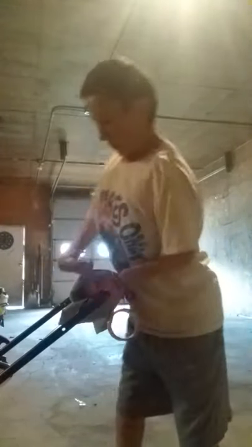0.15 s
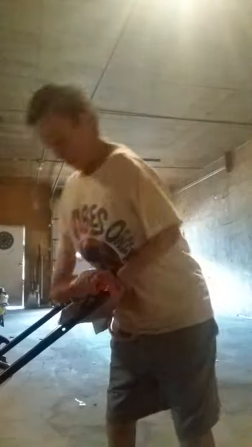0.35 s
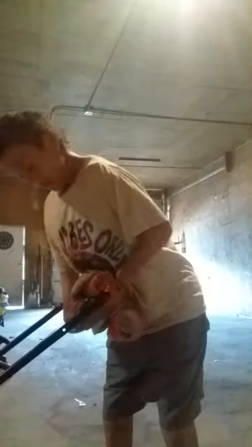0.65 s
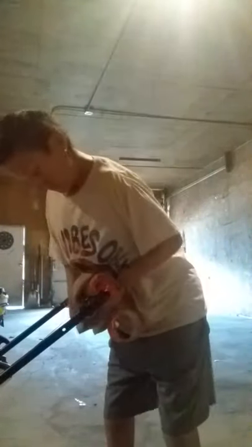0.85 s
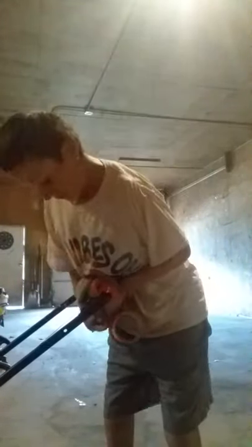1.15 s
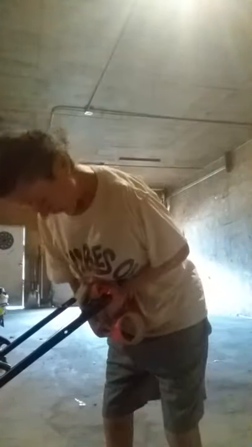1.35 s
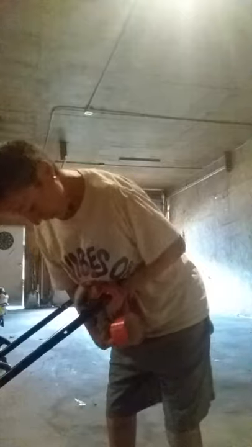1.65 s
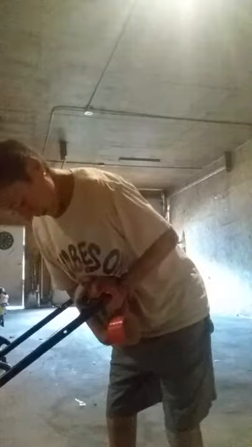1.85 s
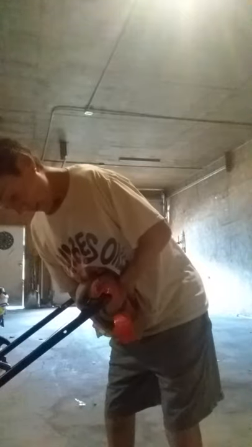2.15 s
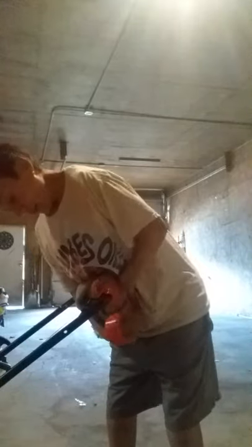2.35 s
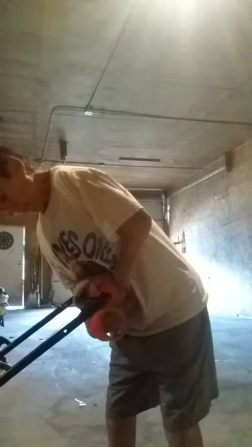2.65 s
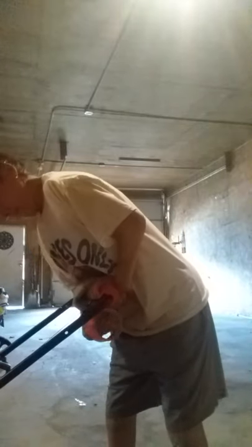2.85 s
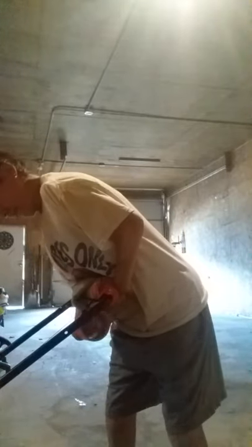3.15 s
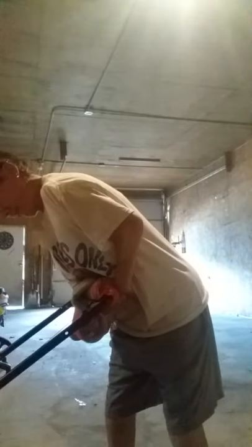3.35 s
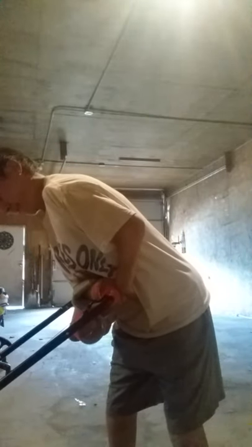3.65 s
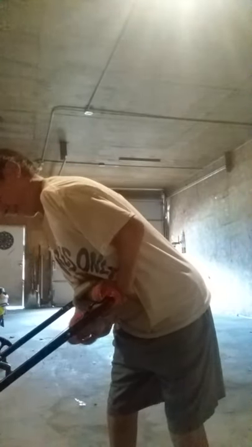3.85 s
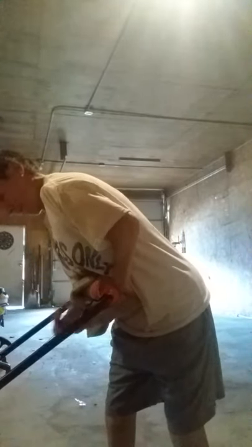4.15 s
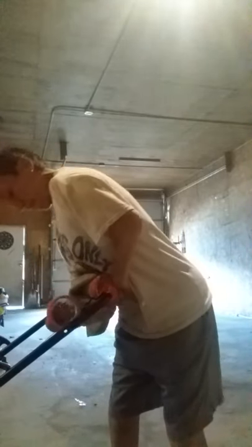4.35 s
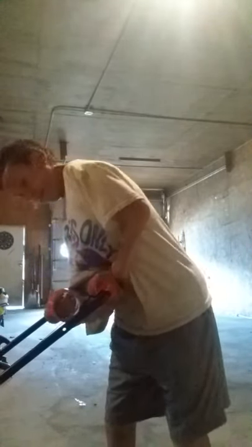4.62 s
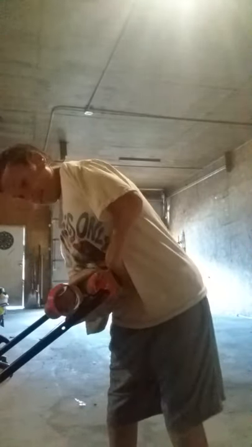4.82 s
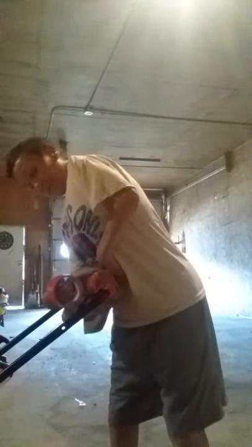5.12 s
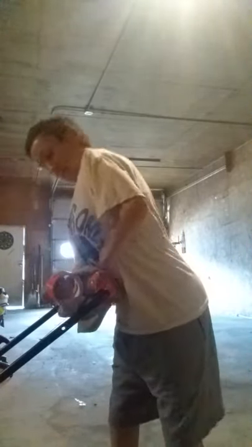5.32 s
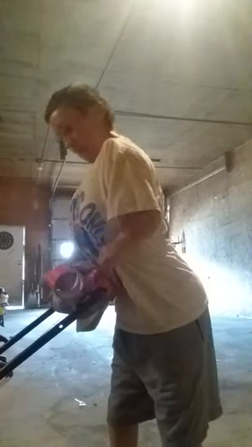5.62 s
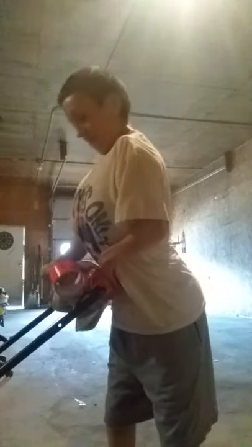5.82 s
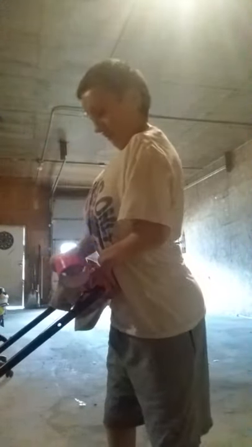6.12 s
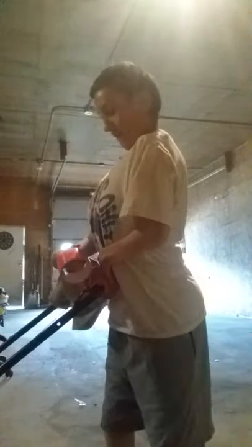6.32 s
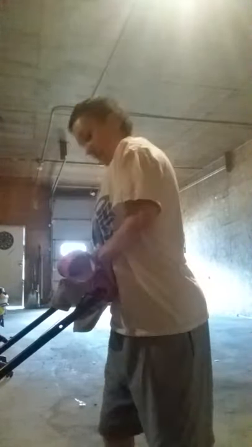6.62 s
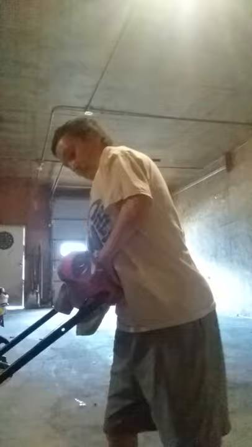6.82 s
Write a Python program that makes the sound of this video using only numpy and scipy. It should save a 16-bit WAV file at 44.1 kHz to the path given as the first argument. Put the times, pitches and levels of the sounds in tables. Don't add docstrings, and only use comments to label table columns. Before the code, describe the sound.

In a bare, hard-walled garage with a faint low hum and hiss, tape is handled close to a stereo microphone, slightly brighter on the right. From 0 to 1.2 s, cloth and skin rustle in short strokes, the handle rumbles, and dull knocks fall at the start, 0.5 and 0.95 s. A deeper double knock comes at 1.56 s amid near quiet and tiny ticks. Rustling resumes at 2.6 s with a low knock at 2.8 s. Then sharp, loud sticky rips crackle at 2.95, 3.34, 3.67, 3.84 and 4.12 s, each under a tenth of a second, with taut strip and hollow roll ringing and walls echoing. A lull follows until soft handling and knocks from 4.87 s. Rubbing grows stronger, a lighter rip snaps at 5.8 s, bright ticks patter from 6.07 to 6.6 s, and final rips crack at 6.64, 6.84 and 6.87 s, the last the loudest.

```python
import sys
import numpy as np
from scipy import signal
from scipy.io import wavfile
from scipy.ndimage import uniform_filter1d

SR = 44100
rng = np.random.default_rng(int(sys.argv[2]) if len(sys.argv) > 2 else 0)


def nominal_scale(level):
    x = np.asarray(level, float) / 20
    return 10 ** x


def log_audio(samples):
    frames = np.atleast_2d(samples).T
    limited = np.clip(frames, -1, 1)
    pcm = np.round(limited * 32767).astype(np.int16)
    wavfile.write(sys.argv[1], SR, pcm)


N = 307818

# pitch_hz [Hz], level_db [dB per Hz]
CRACKLE_COLOUR = [(600, -19), (1300, 0.5), (2000, 1.5), (3000, -4.5), (4500, -2.5), (7400, -4.5),
                  (8200, -15), (9000, -38), (10000, -19.5), (11500, -10), (13500, -21), (16000, -18)]
# low_hz [Hz], high_hz [Hz]
BAND_HZ = [272, 15800]
RIP_FADE_DB = -5
STROKE_ROOM = 15000


def evened(x):
    return x / np.sqrt(np.mean(x ** 2) + 1e-20)


def read(points, hz):
    f, value = np.transpose(points)
    return np.interp(np.log(hz + 1), np.log(f + 1), value)


def add(mix, s, sound):
    part = mix[round(s * SR):][:len(sound)]
    part += sound[:len(part)]


def colour(x, points):
    hz = abs(np.fft.fftfreq(4096, 1 / SR))
    log_gain = np.log(nominal_scale(np.maximum(read(points, hz), -100)))
    phase = -signal.hilbert(log_gain).imag
    taps = np.fft.ifft(np.exp(log_gain + 1j * phase)).real[:2048]
    return signal.oaconvolve(x, taps)[:len(x)]


def modes(x, table):
    out = np.zeros(len(x))
    for hz, width, db in table:
        pole = np.exp((2j * np.pi * hz - np.pi * width) / SR)
        out += nominal_scale(db) * 2 * signal.lfilter([1 - abs(pole)], [1, -pole], x).real
    return out


def glide(x, hz, width):
    turn = np.exp(2j * np.pi * np.cumsum(hz) / SR)
    r = np.exp(-np.pi * width / SR)
    once = signal.lfilter([1 - r], [1, -r], x / turn)
    return (turn * signal.lfilter([1 - r], [1, -r], once)).real


def turns(k, per_s):
    return np.sqrt(2 / 3) * np.cos(2 * np.pi * (np.arange(N) * per_s / SR + k / 3))


def crackle(count, per_s, spread_db):
    hit, size, sign = rng.random((count, 3)).T
    clicks = (hit < per_s / SR) * np.sign(sign - .5)
    return evened(clicks * nominal_scale(-spread_db * np.log(size + .06)))


def snap(db, hz, cycles, fizz, fizz_s):
    t = np.arange(700) / SR
    swell = t * hz / cycles * np.exp(1 - t * hz / cycles)
    puff = evened(colour(rng.standard_normal(len(t)), CRACKLE_COLOUR))
    return nominal_scale(db) * (swell * np.sin(2 * np.pi * hz * t) + fizz * puff * np.exp(-t / fizz_s))


def floor():
    # pitch_hz [Hz], level_db [dB per Hz]
    quiet = [(24, -30.5), (40, -4), (94, 6), (115, -0.5), (167, -17), (231, -19), (345, -14.5),
             (503, -19.5), (1300, -21), (3830, -31.5), (5310, -29), (6490, -22.5), (9690, -27.5),
             (16000, -28)]
    # pitch_hz [Hz], likeness [-1 to 1]
    quiet_same = [(60, 0.87), (240, 0.7), (950, -0.63), (3770, 0.21), (15000, -0.35)]
    # start_s [s], level_db [dB]
    hum_swell = [(0.0, -74.5), (0.58, -72), (1.11, -75), (2.41, -72.5), (3.89, -68.5), (5.23, -71.5),
                 (5.52, -70), (6.06, -71), (6.82, -72), (6.98, -64)]
    frames, hz = N // 512 + 5, np.fft.rfftfreq(2048, 1 / SR)
    a, b, c, d, patches = rng.standard_normal((frames, 1025, 5)).T
    patches = uniform_filter1d(patches, size=6, axis=0)
    patches = evened(uniform_filter1d(patches, size=8, axis=1))
    same = np.clip(read(quiet_same, hz), -1, 1)[:, None]
    left = a + 1j * b
    z = np.array([left, same * left + np.sqrt(1 - same ** 2) * (c + 1j * d)])
    s, hum_db = np.transpose(hum_swell)
    swell_db = np.interp(np.arange(frames) * 512 / SR, s, hum_db - hum_db.mean())
    z *= nominal_scale(read(quiet, hz)[:, None] + 0.5 * patches + (hz < 140)[:, None] * swell_db)
    sound = signal.istft(z, nperseg=2048, noverlap=1536)[1][:, :N]
    return nominal_scale(-66) * evened(sound)


def garage(x):
    # pitch_hz [Hz], t60_s [s]
    ring_time = [(150, 0.59), (400, 0.66), (1040, 0.89), (2760, 0.78), (7280, 0.66), (12000, 0.47)]
    # pitch_hz [Hz], level_db [dB]
    tail_colour = [(150, 4), (400, 0), (1000, 0), (3000, -1.5), (7000, -0.5), (12000, 2)]
    # pitch_hz [Hz], likeness [0 to 1]
    tail_same = [(200, 0.92), (400, 1), (800, 0.32), (1500, 0.09)]
    out = np.zeros((2, N))
    for k in range(3):
        taps = np.zeros((2, SR))
        at = np.arange(200, SR - 12, 12) + rng.integers(0, 12, (2, (SR - 201) // 12))
        np.put_along_axis(taps, at, rng.choice([-1., 1.], at.shape), 1)
        hz, t, z = signal.stft(taps, SR, nperseg=512)
        same = np.clip(read(tail_same, hz), -1, 1)[:, None]
        z[1] = same * z[0] + np.sqrt(1 - same ** 2) * z[1]
        early = 1 - .5 * np.exp(-t / 0.0024)
        z *= early * nominal_scale(read(tail_colour, hz)[:, None] - 60 * t / read(ring_time, hz)[:, None])
        tail = signal.istft(z, SR, nperseg=512)[1]
        tail = tail / np.linalg.norm(tail[0])
        out += signal.fftconvolve((x * turns(k, 30))[None], tail, axes=1)[:, :N]
    return out


def near(x):
    level_db, latest_s = -9.5, .004
    treble = signal.sosfilt(signal.butter(2, 700, "high", fs=SR, output="sos"), x)
    out = x.copy()
    for k in range(3):
        delay, sign = rng.random((14, 2)).T
        taps = np.zeros(1024)
        at = np.clip(6 + delay * latest_s * SR, 6, 1000).astype(int)
        taps[at] = np.sign(sign - .5) * (1 - delay / 2)
        out += nominal_scale(level_db) * signal.oaconvolve(treble * turns(k, 40), taps)[:N]
    return out


def ports(tape, hands, wet):
    # pitch_hz [Hz], left_minus_right_db [dB]
    shade = [(380, .5), (700, -3.5), (2400, -3), (8000, -5), (15000, -8)]
    lag = 4
    left = near(np.roll(tape, lag)) + np.roll(hands, lag) + wet[0]
    right = near(tape) + hands + wet[1]
    return nominal_scale(-0.15) * np.array([colour(left, shade), right])


def pressure(length, lean):
    flicker_db, flicker_s = 2.5, .012
    share = np.clip(np.arange(STROKE_ROOM) / SR / length, 0, 1)
    catches = np.repeat(rng.standard_normal(STROKE_ROOM // 100), 100)
    catches = evened(signal.lfilter([1], [1, -np.exp(-1 / SR / flicker_s)], catches))
    return np.sin(np.pi * share ** lean) * nominal_scale(flicker_db * catches)


def handling():
    # start_s [s], length_s [s], cloth_hiss_db [dB], rubbing_db [dB], rubbing_pitch_hz [Hz]
    strokes = [(.01, 0.31, -54.5, -59.5, 1220), (0.274, 0.26, -52, -54.5, 2370),
               (.49, 0.26, -56, -67, 1110), (.72, 0.26, -63.5, -65, 2440), (.92, 0.21, -89, -60, 1570),
               (1.06, 0.087, -64, -89, 1435), (1.549, .1, -90, -72.5, 1200), (0.281, 0.2, -78, -56, 1020),
               (2.597, 0.38, -60, -85, 1900), (2.654, 0.14, -76.5, -66, 2200),
               (2.79, 0.54, -55.5, -67, 1600), (4.86, 0.11, -84.5, -72, 993), (5.1, .24, -65, -78, 1780),
               (5.35, 0.29, -81.5, -72, 1106), (5.55, 0.089, -65, -60.5, 1128),
               (5.65, 0.29, -65, -59.5, 1284), (5.84, 0.28, -56, -46.5, 2920),
               (6.16, .22, -56.5, -55.5, 1170), (6.33, .26, -53, -52.5, 1620), (6.56, 0.17, -56, -69, 1700)]
    # start_s [s], length_s [s], level_db [dB]
    grips = [(.01, 0.21, -49.5), (0.279, .22, -72), (0.502, 0.18, -54.5), (0.898, 0.27, -67),
             (2.6, 0.44, -69.5), (2.788, 0.23, -56.5), (4.867, 0.22, -67), (5.097, 0.5, -74.5),
             (5.345, 0.14, -63.5), (5.551, 0.41, -63), (5.997, 0.45, -57), (6.34, .24, -51.5),
             (6.56, 0.099, -69)]
    # pitch_hz [Hz], level_db [dB per Hz]
    cloth = [(900, -28), (1600, -8.5), (2700, -8.5), (4500, -6), (7300, -7), (8500, -27), (12000, -18),
             (16000, -41)]
    handle = [(282, 120, 0.5), (417, 200, -8.0), (630, 360, 7.0)]  # pitch_hz, width_hz, level_db
    out, count = np.zeros(N), STROKE_ROOM
    for s, length, hiss_db, rub_db, rub_hz in strokes:
        hiss = colour(crackle(count, per_s=5400, spread_db=6.0), cloth)
        grains = crackle(count, per_s=3000, spread_db=-1.5)
        rub = glide(grains, np.full(count, rub_hz), width=.42 * rub_hz)
        sound = nominal_scale(hiss_db + 2.0) * evened(hiss) + nominal_scale(rub_db) * evened(rub)
        add(out, s, nominal_scale(-2.5) * sound * pressure(length, lean=0.5))
    for s, length, db in grips:
        rumble = modes(crackle(count, per_s=610, spread_db=-3.5), handle)
        add(out, s, nominal_scale(db - 3.5) * evened(rumble) * pressure(length, lean=0.58))
    return out


def small_hits():
    # start_s [s], peak_db [dB], ring_hz [Hz]
    ticks = [(0.754, -66, 2550), (0.829, -47.5, 2660), (1.067, -51, 5640), (1.1094, -63, 2510),
             (1.494, -57, 7670), (1.7694, -63, 4130), (1.9894, -61, 5100), (2.207, -63.5, 6350),
             (2.27, -59.5, 1300), (2.6065, -60, 6740), (2.9437, -39.5, 2000), (3.0184, -37, 5410),
             (3.27, -41, 3250), (3.3211, -33.5, 2790), (3.701, -33, 2480), (5.115, -61, 6540),
             (5.3091, -50.5, 2720), (5.6656, -49, 3520), (6.0694, -43.5, 2704), (6.1306, -46, 3140),
             (6.1775, -37.5, 5150), (6.2315, -39, 6600), (6.2952, -37.5, 6700), (6.338, -38, 7340),
             (6.3678, -54, 7500), (6.543, -41, 6135), (6.5723, -45, 5286), (6.591, -35.5, 6130)]
    # start_s [s], peak_db [dB], ring_hz [Hz]
    knocks = [
        (0.022, -43.5, 680),
        (0.529, -42, 515),
        (0.952, -56.5, 390),
        (1.562, -40, 268),
        (1.582, -50, 415),
        (2.81, -45.5, 230),
        (4.869, -48.5, 648),
        (5.359, -53.5, 1083),
        (5.562, -46, 250),
    ]
    out = np.zeros(N)
    for s, db, hz in ticks:
        add(out, s, snap(db - 3.0, hz, cycles=.8, fizz=1.0, fizz_s=0.0011))
    t = np.arange(4000) / SR
    for s, db, hz in knocks:
        blow = rng.standard_normal(len(t)) * np.exp(-t / 0.043)
        pitch = np.full(len(t), hz)
        shake = glide(glide(blow, pitch, width=520), pitch, width=520)
        add(out, s, nominal_scale(db - 6.0) * shake / abs(shake).max())
    return out


def slips(s, length):
    # start_s [s], peak_db [dB], ring_hz [Hz]
    strong_slips = [(2.9583, -16.8, 3800), (2.9683, -15.9, 5300), (2.9776, -13.1, 3800),
                    (2.9869, -12.7, 3800), (2.9932, -15.4, 5300), (2.9993, -16.5, 1300),
                    (3.344, -13.4, 2700), (3.3468, -17.5, 5300), (3.6761, -16.0, 2700),
                    (3.684, -17.2, 2700), (3.3578, -21, 7400), (3.8444, -18.3, 5300), (3.8631, -14.1, 3800),
                    (3.8694, -15.3, 1300), (4.1282, -13.2, 2700), (4.1345, -15.8, 5300),
                    (4.1405, -12.6, 5300), (4.1487, -11.5, 1300), (4.1567, -13.7, 1300),
                    (4.1636, -12.4, 1300), (4.1681, -14.5, 2700), (5.82, -18.9, 3200),
                    (5.8239, -19.5, 3200), (5.8341, -19.8, 7400), (6.6445, -14.4, 2700),
                    (6.6532, -18.6, 3800), (6.8378, -12.9, 5300), (6.8693, -9.5, 3800),
                    (6.8759, -12.9, 5300), (6.882, -14.5, 2700)]
    gap_s = .0037
    over_crackle_db, scatter_db, low_hz, high_hz = 3.5, 2, 900, 7900
    strong = [row for row in strong_slips if s - gap_s <= row[0] <= s + length + gap_s]
    db = np.mean(strong, axis=0)[1] - 11
    nudge, size, ring = rng.random((16, 3)).T
    at = strong[0][0] + gap_s * (np.arange(16) + .6 + .6 * nudge)
    nearest_s = abs(at[:, None] - np.array(strong)[:, 0]).min(axis=1)
    free = (at < s + length) & (nearest_s > gap_s / 2)
    weak_db = db + over_crackle_db + RIP_FADE_DB * (at - s) / length - scatter_db * size
    weak_db = np.where(free, weak_db, -np.inf)
    weak_hz = low_hz * (high_hz / low_hz) ** ring
    return db, strong + list(np.transpose([at, weak_db, weak_hz]))


def rips():
    # start_s [s], length_s [s], film_db [dB], drum_db [dB], strip_db [dB]
    jerks = [
        (2.9549, 0.051, -12, -3, 1.5),
        (3.3396, .022, -2.5, 3.5, 6),
        (3.672, 0.025, -13, 1.5, 7),
        (3.8433, 0.05, -7.5, 4, 4.5),
        (4.1246, 0.041, -11, 1.5, 5.5),
        (5.813, 0.034, 1.5, 0.7, 9),
        (6.643, 0.037, -5.5, -5, 2.5),
        (6.837, 0.0053, -3.5, 6, 4),
        (6.8655, 0.02, -9, -4.5, -4),
    ]
    # pitch_hz [Hz], width_hz [Hz], level_db [dB]
    roll = [(274.6, 18, -4.5), (401, 48, 1.5)]
    # pitch_hz [Hz], width_hz [Hz], level_db [dB]
    first_bend = [(700, 190, -7), (724, 90, -2.5), (924, 30, -4)]
    # pitch_hz [Hz], width_hz [Hz], level_db [dB]
    second_bend = [(1138, 250, -11), (1398, 17, -12)]
    film_hz, second_bend_db = 3020, -3
    out, clumps = np.zeros(N), np.zeros(N)
    tap = signal.unit_impulse(2000)
    drum, strip = modes(tap, roll), modes(tap, first_bend + second_bend)
    for s, length, film_db, drum_db, strip_db in jerks:
        pull_db, rows = slips(s, length)
        kick = nominal_scale(drum_db) * drum + nominal_scale(strip_db - 4) * strip
        kicks_db = pull_db + (drum_db + strip_db) / 2 - 2 - 16.5 * rng.random(30)
        for (at, db, hz), kick_db in zip(rows, kicks_db):
            add(out, at - .0006, snap(db - 1.5, hz, cycles=0.94, fizz=0.35, fizz_s=.0015))
            add(out, at - .0006, np.isfinite(db) * nominal_scale(kick_db) * kick / kick.max())
            add(clumps, at - .0008, nominal_scale(db + 17) * np.exp(-np.arange(600) / SR / .0018))
        t = np.arange(5000) / SR
        pull = nominal_scale(pull_db + RIP_FADE_DB * t / length) * np.clip((length - t) / 0.0036, 0, 1)
        clump = clumps[round(s * SR):][:len(t)]
        pull = pull * (.4 + clump) * (np.cumsum(clump) > 0)
        glue = crackle(len(t), per_s=4500, spread_db=1.0)

        def driven(body):
            return body(pull * glue) / np.std(body(glue))

        add(out, s, driven(lambda x: colour(x, CRACKLE_COLOUR)))
        film = driven(lambda x: glide(x, np.full(len(t), film_hz), width=1900))
        add(out, s, nominal_scale(film_db) * film)
        for db, table in ((drum_db, roll), (strip_db, first_bend), (second_bend_db, second_bend)):
            add(out, s, nominal_scale(db - 4.0) * driven(lambda x: modes(x, table)))
    return out


def scene():
    # pitch_hz [Hz], width_hz [Hz], level_db [dB]
    handle_frame = [(119, 60, -5)]
    band = signal.butter(4, BAND_HZ[0], "high", fs=SR, output="sos")
    jerks = rips()
    tape, hands = signal.sosfilt(band, [jerks + small_hits(), handling()])
    tape = tape + modes(jerks, handle_frame)
    wet = garage(nominal_scale(-2.5) * tape + nominal_scale(-2.0) * hands)
    return ports(tape, hands, wet) + floor()


def top_cut(x):
    return signal.sosfilt(signal.butter(12, 16990, fs=SR, output="sos"), x)


def record(dry):
    ceiling = .75
    rounded = ceiling * np.tanh(dry / ceiling)
    low_cut = signal.sosfilt(signal.butter(2, 48, "high", fs=SR, output="sos"), rounded)
    edge = signal.firwin(95, BAND_HZ[1], fs=SR)[None]
    return top_cut(signal.oaconvolve(low_cut, edge, "same"))


dry = scene()
out = record(dry)
log_audio(out)
```